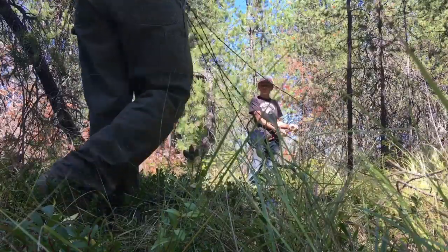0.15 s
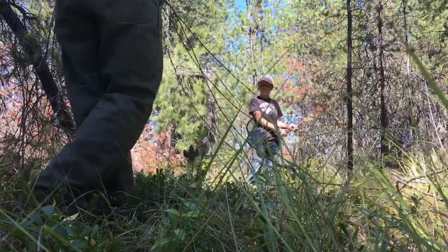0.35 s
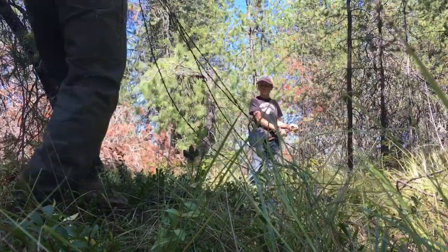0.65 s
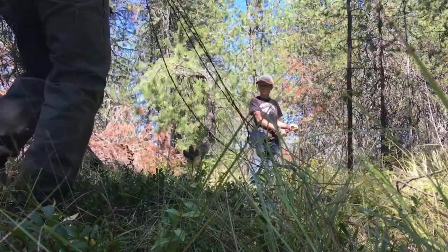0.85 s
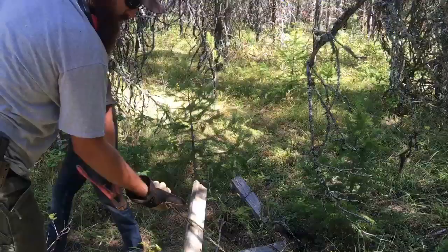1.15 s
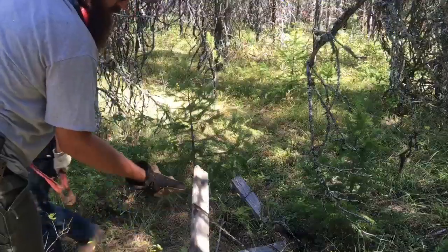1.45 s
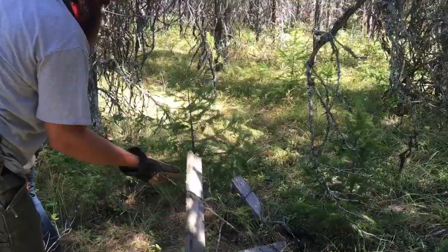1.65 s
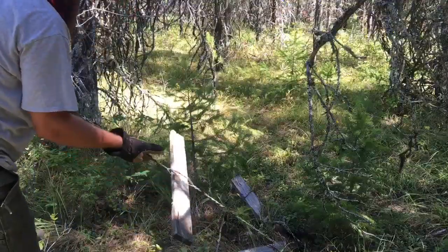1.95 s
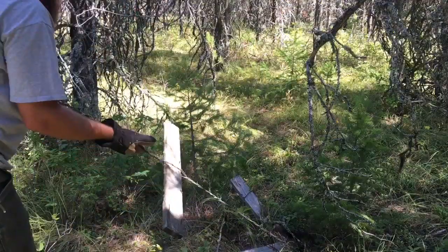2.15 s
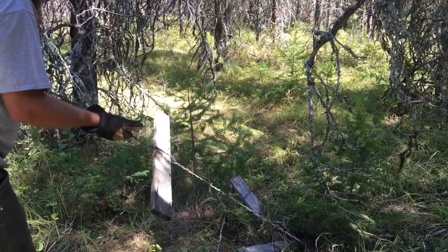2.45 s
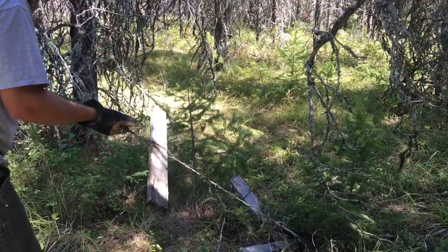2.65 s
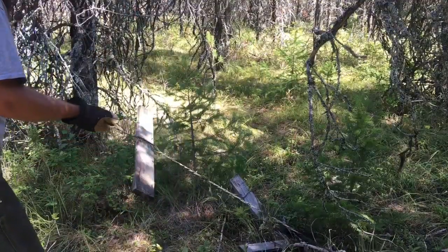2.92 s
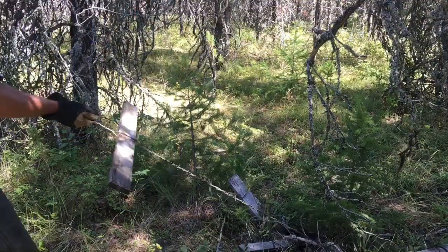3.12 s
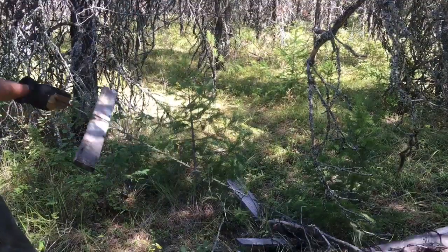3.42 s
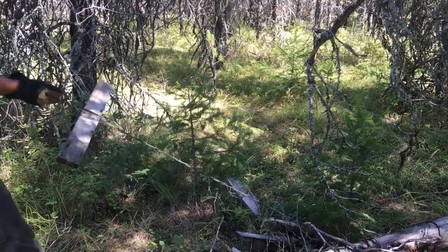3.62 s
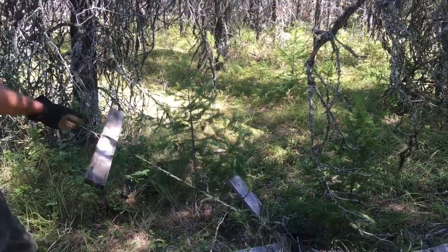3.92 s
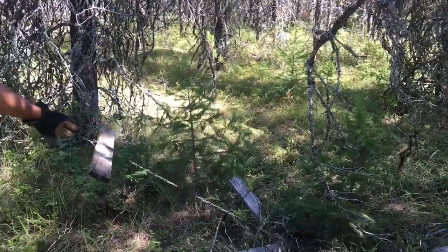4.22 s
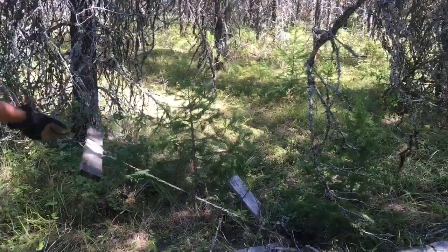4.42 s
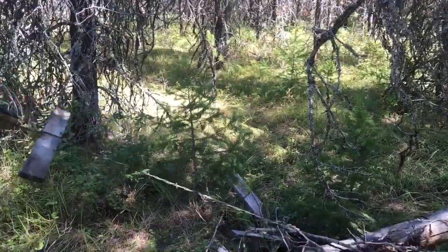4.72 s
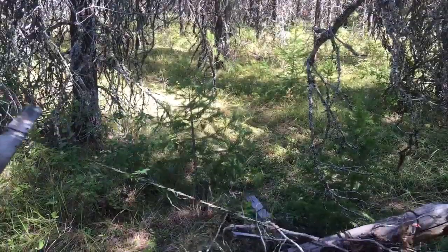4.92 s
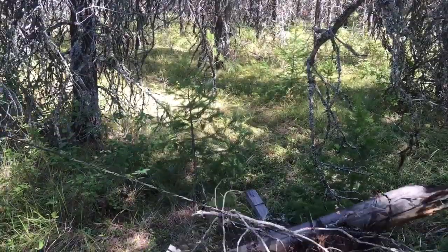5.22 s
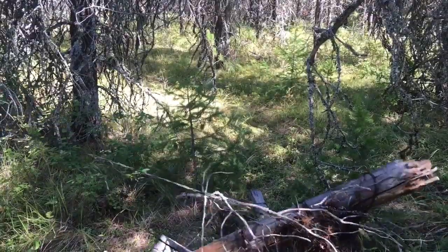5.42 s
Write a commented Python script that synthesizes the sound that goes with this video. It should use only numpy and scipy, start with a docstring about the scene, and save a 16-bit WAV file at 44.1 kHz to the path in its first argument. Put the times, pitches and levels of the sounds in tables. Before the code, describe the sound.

Close by in the open air of a forest, a soft, crisp rustle of grass grows in surges as someone hauls old wire, dotted with sharp little twig cracks. Light, irregular knocks come from a wooden slat on the wire, then boots thud dully on soft earth. Finally the wire scrapes and clacks against a dead branch, which crackles through leaf litter over a faint microphone rumble.

```python
"""Old barbed wire, with wooden stays still hanging on it, is hauled through grass and brush in a forest.
With every pull, countless small contacts add up to the swish of blades and the crackle of stems.
Twigs snap by brittle fracture, the wire knocks its stays into resonance and boots thud on soft earth.
Near the end the wire rasps along a dead branch by stick-slip friction, catches on it and drags it
through the undergrowth. Air and handling rumble faintly on the microphone."""
import sys
import numpy as np
from scipy import signal
from scipy.fft import rfft, irfft, next_fast_len
from scipy.io import wavfile

SR = 44100
rng = np.random.default_rng(int(sys.argv[2]) if len(sys.argv) > 2 else 0)


def store_wav(level_fs):
    """Save 16-bit WAV to argv[1]."""
    pcm = np.round(np.clip(np.atleast_2d(level_fs), -1, 1) * 32767)
    wavfile.write(sys.argv[1], SR, pcm.T.astype(np.int16))


N = 245637
CUTOFF_HZ = 15900
EVENT_SAMPLES = 4096

# modes of the dead branch: (frequency [Hz], bandwidth [Hz], gain [dB])
BRANCH_MODES = [(700, 200, -1.5), (1090, 290, -5.5), (1800, 170, 1), (2150, 260, -4), (2550, 440, -4.5),
                (2930, 160, -2), (3274, 160, 0.5), (4270, 250, -4.5), (4460, 340, -3.5), (6500, 760, -9)]


def haul():
    """Incoherent addition: tugs and steady motion of the wire sum in power to stir plants and ground."""
    # tugs and strides, with relative levels:
    # (start [s], rise [s], hold [s], fall [s], grass [dB], stems [dB], ground [dB])
    pulls = [(0.23, 0.095, 0.17, 0.59, -59, -64.5, -55), (0.969, 0.17, 0.081, 0.047, -48, -55.5, -56),
             (1.443, 0.0089, 0.044, 0.12, -48.5, -60, -64), (1.66, 0.092, 0.25, .09, -43, -59.5, -58.5),
             (2.231, 0.084, 0.22, .07, -44.5, -56, -63.5), (2.644, 0.672, 0.3, 0.12, -39.5, -47, -52.5),
             (3.763, 0.062, 0.22, .1, -52.5, -59, -75), (4.536, 0.21, 0.46, 1, -39.5, -46, -50)]
    # the wire sliding on through the grass: (time [s], relative level [dB])
    slide_curve = [(0, -51), (.2, -53), (.78, -51.5), (.92, -54), (1.33, -57.5), (1.6, -49.5),
                   (2.15, -46.5), (2.65, -47.5), (4.2, -51), (5.57, -44)]
    # its load dragging over leaf litter: (time [s], relative level [dB])
    drag_curve = [(0, -71.5), (.95, -79), (1.3, -65.5), (2.2, -62), (3.73, -59), (3.85, -56.5), (4.56, -55),
                  (4.8, -43.5), (5.2, -47.5), (5.57, -48)]
    t, tugs = np.arange(N) / SR, 0
    for start, rise, hold, fall, *levels_db in pulls:
        effort = np.clip(np.minimum((t - start) / rise, 1 - (t - start - rise - hold) / fall), 0, 1)
        tugs = tugs + np.outer(from_db(levels_db), effort)
    grass, stems, ground = tugs
    slide, drag = gain_curve(slide_curve), gain_curve(drag_curve)
    swept = power_sum(grass, slide)
    brushed = power_sum(stems, from_db(-10.5) * slide)
    dragged = power_sum(drag, from_db(-7.5) * ground)
    shaken = power_sum(ground, from_db(-14.5) * drag, from_db(-62.5))   # never quite at rest
    return swept, brushed, dragged, shaken


def undergrowth(swept, brushed, dragged, shaken):
    """Superposed random impacts make a rustle: dense in fine grass, sparser in coarse material."""
    # spectra of the four rustles: (frequency [Hz], relative spectral density [dB])
    grass_spectrum = [(1500, -33), (3500, -9), (6000, -4), (9000, 0), (12500, 0.5), (15500, -3)]
    stem_spectrum = [(700, -9.5), (1300, -5.5), (2000, -1.5), (2900, 1.5), (4500, -2), (7000, -7.5),
                     (12000, -12.5)]
    litter_spectrum = [(120, -10), (300, 1.5), (550, 0.5), (1000, 0.5), (1600, -4.5), (3000, -10.5),
                       (6000, -18)]
    ground_spectrum = [(35, -22), (60, 0.5), (110, -2), (200, -1.5), (330, -6), (600, -11.5), (1500, -56)]
    grass = rustle(grass_spectrum, per_s=2000, spread_db=3, blur_db=5, flutter_db=1.45, flutter_hz=70)
    stems = rustle(stem_spectrum, per_s=500, spread_db=2, blur_db=5, flutter_db=2, flutter_hz=80)
    litter = rustle(litter_spectrum, per_s=550, spread_db=2, blur_db=3, flutter_db=3, flutter_hz=80)
    ground = rustle(ground_spectrum, per_s=200, spread_db=3, blur_db=1, flutter_db=3, flutter_hz=26)
    return (swept * from_db(2) * grass + brushed * from_db(3) * stems
            + dragged * from_db(0.5) * litter + shaken * from_db(0.38) * ground)


def stalk_breaks(swept, per_s=7, spread_db=10, centre_hz=9000, decay_ms=0.36):
    """A Poisson process: fine stalks break at random, as strongly as the grass is being swept."""
    draws = rng.random((128, 3))
    times = np.cumsum(-np.log(1 - draws[:, 0])) / per_s
    return [(s, 20 * np.log10(swept[int(s * SR)]) + 13 + spread_db * size,
             centre_hz * 2 ** (thinness / 2), decay_ms)
            for s, (size, thinness) in zip(times, 2 * draws[:, 1:] - 1) if s * SR < N]


def twig_snaps(stalks, breadth=0.82):
    """Brittle fracture gives a sharp crack over a duller pop; the thinner the twig, the higher it is."""
    # dry twigs and stalks snapping: (time [s], relative level [dB], centre [Hz], decay [ms])
    snaps = [(.2837, -28, 9500, 0.55), (.3628, -19.5, 6800, .47), (.5468, -32, 3300, .7),
             (.9595, -41.5, 3180, 2.1), (1.1296, -22, 11000, 0.57), (1.1303, -28, 3800, 0.71),
             (1.1385, -40, 1700, 2.7), (1.1992, -29.5, 3500, 1.5), (1.4479, -16.5, 11100, 1.1),
             (1.733, -28.5, 4960, .6), (1.818, -19.5, 8700, 0.36), (2.1573, -30.5, 4300, 1.1),
             (2.389, -22, 12000, .4), (2.7572, -24, 5430, .5), (3.4262, -17.5, 12100, .3),
             (3.5553, -9, 12000, .17), (3.8958, -35, 3400, 1.5), (4.3528, -32.5, 6000, 0.42),
             (4.9833, -17, 8060, 0.98), (5.1062, -17, 7500, .65), (5.2129, -13, 13000, .4),
             (5.2493, -11.5, 11000, .3), (5.5149, -18.5, 7350, .39)]
    out = np.zeros(N)
    for s, db, hz, decay_ms in snaps + stalks:
        fracture, energy = burst(decay_ms, tail_db=-20.5, tail_ms=7 * decay_ms)
        fracture[0] = 2   # the main fibre goes first
        crack = resonance(resonance(fracture, hz, breadth * hz), hz, 2 * breadth * hz)
        body, _ = burst(decay_ms, tail_db=-16, tail_ms=5)
        pop = resonance(body, hz / 3.1, hz / 2)
        snap = with_energy(crack, energy) + from_db(-13) * with_energy(pop, energy)
        add(out, s, from_db(db - 3.5) * snap)
    return out


def stay_knocks():
    """Impact excitation: the wire strikes a hanging wooden stay, which rings in its damped modes."""
    # strikes: (time [s], relative level [dB], centre [Hz], decay [ms])
    hits = [(1.755, -39, 1500, 4.9), (1.8478, -37, 1600, 4.8), (1.876, -39.5, 1500, 3.7),
            (1.971, -33, 1500, 4.8), (2.034, -39, 1500, 3.7), (2.158, -34.5, 2100, 5.5),
            (2.205, -33, 1400, 7.8), (2.449, -26.5, 1750, 5.8), (2.7395, -30.5, 2000, 4.5),
            (2.926, -35, 1800, 4.5), (3.1255, -26, 1570, 4.2), (3.2087, -38, 2700, 4),
            (3.3115, -34.5, 1500, 4.9), (3.4035, -35, 2200, 1.5)]
    # modes of the stay: (frequency [Hz], bandwidth [Hz], gain [dB])
    stay_modes = [(613, 180, 1.5), (1160, 104, -3.5), (1506, 74, 6), (1760, 130, -3.5), (1930, 190, -2),
                  (2750, 220, -6), (3400, 270, 1), (4550, 220, -10)]
    return from_db(-5) * knocks(hits, stay_modes, breadth=1.34, grip_ms=1.2)


def branch_knocks():
    """Impulsive loading: the wire catches abruptly on the dead branch and excites its modes."""
    # catches: (time [s], relative level [dB], centre [Hz], decay [ms])
    hits = [(4.7162, -24, 2180, 8.6), (4.7475, -23.5, 2100, 2.6), (4.7605, -27, 2100, 3.7),
            (4.7769, -10, 2330, 1.94), (4.7875, -24, 2720, 12.4), (4.802, -25.5, 1290, 8.4),
            (4.873, -28, 1900, 3), (4.8877, -13.5, 2250, 2.4), (4.937, -30.5, 2200, 4.5),
            (4.9835, -15.5, 3700, 2.2), (5.0468, -23.5, 1700, 4.2), (5.081, -26.5, 1290, 7.4),
            (5.1064, -20, 4200, 1.6), (5.2412, -28.5, 2800, 3), (5.415, -22, 880, 1.5)]
    return from_db(-4) * knocks(hits, BRANCH_MODES, breadth=0.76, grip_ms=0.26)


def branch_rasps(edge_s=0.0041):
    """Stick-slip friction: rusty wire slides along the branch and drives its modes with rapid slips."""
    # strokes: (start [s], end [s], level [dB], centre [Hz])
    strokes = [(4.576, 4.597, -39.5, 3400), (4.616, 4.659, -34.5, 3280), (4.659, 4.676, -39.5, 3400),
               (4.696, 4.73, -36.5, 2700)]
    # spectrum of the sliding contact: (frequency [Hz], relative spectral density [dB])
    rust_spectrum = [(800, -2.5), (1800, -6.5), (2700, -0.5), (3500, -4.5), (4400, 3.5), (5200, -6.5),
                     (8000, -4)]
    out, t = np.zeros(N), np.arange(EVENT_SAMPLES) / SR
    friction = rustle(rust_spectrum, per_s=830, spread_db=-5, blur_db=7, flutter_db=-4, flutter_hz=160)
    for start, end, db, hz in strokes:
        slips = friction[int(start * SR):][:len(t)]
        envelope = np.clip(t / edge_s, 0, 1) * np.clip((end - start - t) / edge_s + 1, 0, 1)
        add(out, start, from_db(db) * envelope * rms_one(wood(slips, BRANCH_MODES, hz, breadth=1.15)))
    return out


def thuds(sag=0.16, crunch_hz=463, weight_lag_s=0.007):
    """Damped oscillation: struck earth swings briefly, sinking in pitch, as its litter is crushed."""
    # boots and heavy wood landing:
    # (time [s], relative level [dB], mid pitch [Hz], decay [ms], weight against touch [dB])
    landings = [(.3636, -33, 260, 7.4, -4), (.463, -49.5, 433, 20, -12), (1.131, -37.5, 258, 5.5, 5),
                (1.645, -44.5, 282, 5.1, -7), (3.545, -40, 191, 23, -10), (3.645, -38.5, 194, 16, -15),
                (4.3125, -28.5, 270, 5.2, -3), (4.3525, -29.5, 425, 2.3, -12), (4.383, -36, 160, 4.6, -10),
                (4.423, -26.5, 179, 4.2, -5.5), (4.599, -36.5, 200, 8.7, -13)]
    out, t = np.zeros(N), np.arange(EVENT_SAMPLES) / SR
    touches = [row[:-1] for row in landings]
    # the weight lands after the touch, lower and longer
    weights = [(s + weight_lag_s, db + weight_db, hz * 0.48, decay_ms * 1.7)
               for s, db, hz, decay_ms, weight_db in landings]
    for s, db, hz, decay_ms in touches + weights:
        age = t * 1000 / decay_ms
        phase = 2 * np.pi * np.cumsum(hz * (1 + sag * (np.exp(-age) - .5))) / SR
        noise = rng.standard_normal(len(t))
        crunch = rms_one(resonance(resonance(noise, crunch_hz, 380), crunch_hz, 1800))
        thud = np.sin(phase) * np.exp(-age) + from_db(-18) * crunch * np.exp(-age / 2)
        attack = 1 - np.exp(-6 * age)
        add(out, s, from_db(db + 1) * thud * attack)
    return out


def buffeting():
    """Slow pressure fluctuations from air and handling rumble on the moving microphone."""
    # strength of the rumble: (time [s], level [dB])
    rumble_curve = [(0, -68), (1.5, -80), (3.1, -68), (3.55, -55), (4.1, -70), (5.57, -55)]
    # its spectrum: (frequency [Hz], relative spectral density [dB])
    rumble_spectrum = [(22, -29), (38, -3), (55, 1), (80, -21), (160, -44)]
    return gain_curve(rumble_curve) * coloured(rng.standard_normal(N), rumble_spectrum)


def rustle(spectrum, per_s, spread_db, blur_db, flutter_db, flutter_hz):
    """Shot noise: tiny contacts of uneven size come in clumps over a blur of fainter ones; rms 1."""
    sizes = from_db(spread_db * np.minimum(rng.exponential(1, N), 4)) * rng.choice([-1, 1], N)
    grains = rms_one(sizes * (rng.random(N) < per_s / SR))
    contacts = grains + from_db(blur_db) * rng.standard_normal(N)
    return coloured(contacts * from_db(flutter_db * drift(flutter_hz)), spectrum)


def knocks(hits, modes, breadth, grip_ms):
    """Transient excitation: a barb bites into the wood, lets go and rattles it."""
    out, ms = np.zeros(N), np.arange(EVENT_SAMPLES) / SR * 1000
    grip = 1 - np.exp(-ms / grip_ms)
    for s, db, hz, decay_ms in hits:
        slip, energy = burst(decay_ms, tail_db=-33, tail_ms=9.9)
        add(out, s, from_db(db) * with_energy(wood(slip * grip, modes, hz, breadth), energy))
    return out


def wood(force, modes, centre_hz, breadth):
    """Modal superposition: the contact favours one band, and the wood's modes respond to it."""
    contact = resonance(force, centre_hz, breadth * centre_hz)
    return sum((-1) ** k * from_db(db) * resonance(contact, hz, width_hz)
               for k, (hz, width_hz, db) in enumerate(modes))


def burst(decay_ms, tail_db, tail_ms):
    """Exponential decay of micro-fractures and their scatter off ground and plants; also its energy."""
    ms = np.arange(EVENT_SAMPLES) / SR * 1000
    envelope = np.exp(-ms / decay_ms) + from_db(tail_db) * np.exp(-ms / tail_ms)
    return envelope * rng.choice([-1, 1], len(ms)), np.sum(envelope ** 2)


def resonance(x, hz, width_hz):
    """A damped resonator: two-pole band-pass with gain 1 at its centre."""
    radius = np.exp(-np.pi * width_hz / SR)
    angle = 2 * np.pi * min(hz, CUTOFF_HZ) / SR
    numerator = np.array([1, 0, -1]) * (1 - radius ** 2) / 2
    denominator = [1, -(1 + radius ** 2) * np.cos(angle), radius ** 2]
    return signal.lfilter(numerator, denominator, x + 1e-18)


def coloured(x, spectrum):
    """Spectral shaping, with skirts that fall away beyond the spectrum's ends; rms 1."""
    hz, db = np.transpose(spectrum)
    size = next_fast_len(N)
    f = np.maximum(np.fft.rfftfreq(size, 1 / SR), 1)
    skirts = np.minimum(f / hz[0], 1) ** 2 * np.minimum(hz[-1] / f, 1)
    gain = from_db(np.interp(np.log(f), np.log(hz), db))
    return rms_one(irfft(rfft(x, size) * skirts * gain, size)[:N])


def drift(rate_hz):
    """Random wander: linear interpolation between Gaussian values of spread 1."""
    knots = rng.standard_normal(2048)
    return np.interp(np.arange(N) / SR * rate_hz, np.arange(len(knots)), knots)


def gain_curve(rows):
    """Amplitude envelope through points of (time [s], level [dB])."""
    times, db = np.transpose(rows)
    return from_db(np.interp(np.arange(N) / SR, times, db))


def power_sum(*gains):
    """Joint amplitude of uncorrelated sounds, whose powers add."""
    return np.sqrt(sum(g ** 2 for g in gains))


def from_db(db):
    """Decibels to amplitude ratio."""
    return 10 ** (np.asarray(db) / 20)


def rms_one(x):
    """Normalise to unit rms."""
    return x / np.sqrt(np.mean(x ** 2) + 1e-20)


def with_energy(x, energy):
    """Normalise to a given energy."""
    return x * np.sqrt(energy / np.sum(x ** 2))


def add(track, s, sound):
    """Superpose a sound on a track at a time in seconds."""
    at = int(s * SR)
    track[at:at + len(sound)] += sound[:max(N - at, 0)]


def scene():
    """Linear superposition of sources close by, in the open air."""
    swept, brushed, dragged, shaken = haul()
    plants = undergrowth(swept, brushed, dragged, shaken)
    air = buffeting()
    wire_on_wood = stay_knocks() + branch_knocks() + branch_rasps()
    steps = thuds()
    snaps = twig_snaps(stalk_breaks(swept))
    return (plants + snaps + wire_on_wood + steps + air)[None]


def record(dry):
    """The microphone's frequency response colours the treble; the level dips once; the top is cut."""
    # hollows and a rise in the microphone's treble: (frequency [Hz], bandwidth [Hz], gain [dB])
    treble_response = [(3730, 1260, -4), (4900, 700, -4.5), (6340, 660, 2), (7720, 1300, -3.5),
                       (10450, 670, -6.5)]
    for hz, width_hz, db in treble_response:
        dry = dry + (from_db(db) - 1) * resonance(dry, hz, width_hz)
    dip_s, dip_half_width_s, dip_db = 1.238, 0.0086, -35
    t = np.arange(N) / SR
    dip = from_db(dip_db / (1 + ((t - dip_s) / dip_half_width_s) ** 2))
    low_pass = signal.ellip(10, .2, 80, CUTOFF_HZ, fs=SR, output="sos")
    return signal.sosfilt(low_pass, dry * dip)


dry = scene()
out = record(dry)
store_wav(out)
```